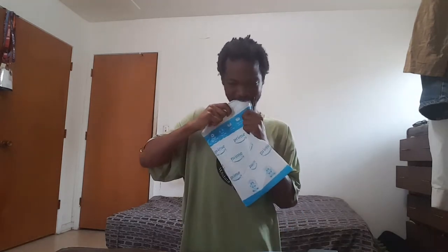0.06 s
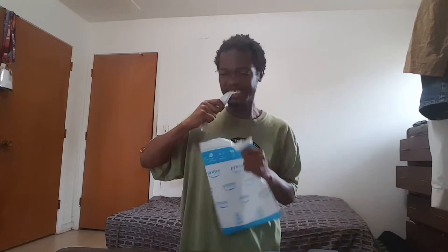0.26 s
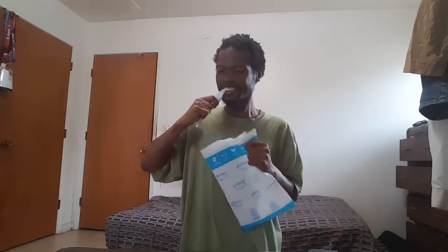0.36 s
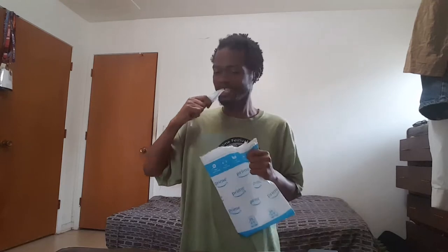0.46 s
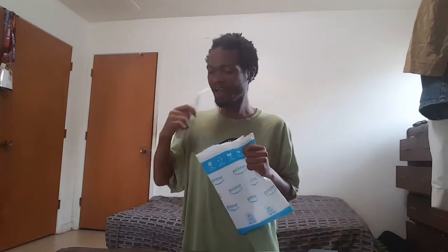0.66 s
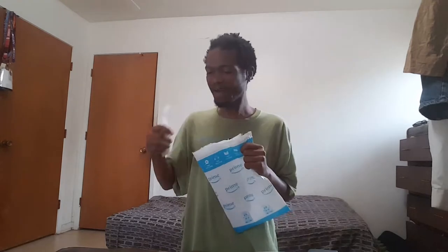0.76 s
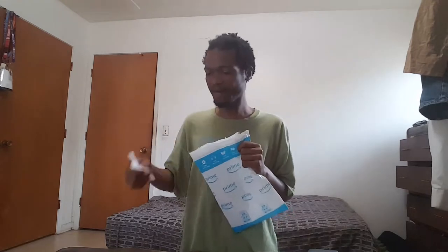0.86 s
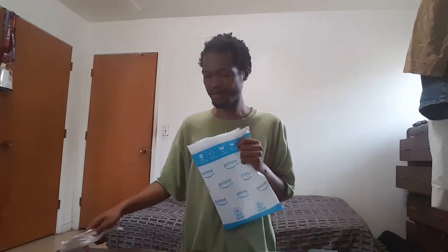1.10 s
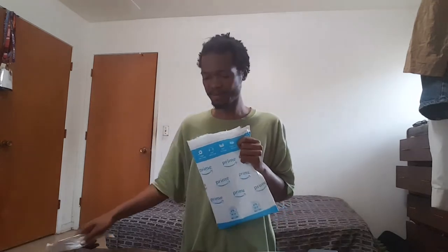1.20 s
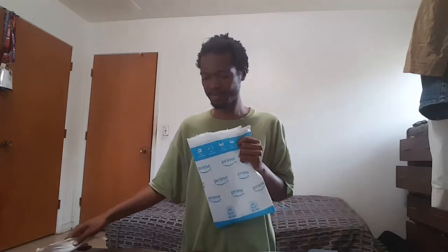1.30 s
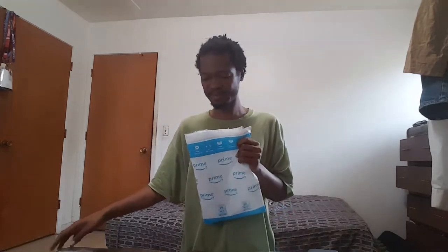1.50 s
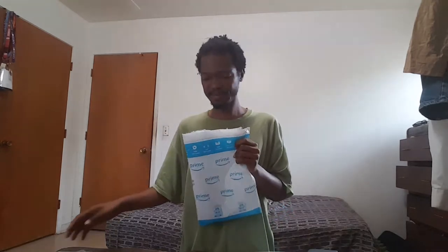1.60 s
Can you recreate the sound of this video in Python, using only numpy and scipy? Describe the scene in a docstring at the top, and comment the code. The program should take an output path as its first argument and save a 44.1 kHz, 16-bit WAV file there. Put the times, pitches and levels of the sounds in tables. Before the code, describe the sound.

A padded plastic mailer is torn open a few steps away in a small, quiet bedroom. It crinkles briefly, then at about 0.2 seconds rips in one loud, jerky pull with a soft thump. Creases crackle and pop until around 0.7 seconds, then thin to faint rustling. Near 1.5 seconds the torn strip is put down with a light, hollow tap. The walls add a short echo.

```python
"""Thin plastic crinkles and ticks as hands tense a padded mailer in a small bedroom, a few steps away.
One quick pull rips it open: the tear runs in slips and hard jerks that thump the pouch, the parting
film fizzes and the swinging pouch pushes a puff of air. Creases pop back and rustle, and the torn
strip is put down with a light, hollow tap. Bare walls add a short, bright tail over quiet room tone."""
import sys
import numpy as np
from scipy import signal
from scipy.fft import rfft, irfft
from scipy.io import wavfile

SR = 44100
rng = np.random.default_rng(int(sys.argv[2]) if len(sys.argv) > 2 else 0)


def to_wav(sig):
    """Store sig (one row per channel, or 1-D mono) as 16-bit WAV at the path in sys.argv[1].

    Samples outside -1..1 are clipped; the rate is SR.
    """
    pcm = np.clip(np.atleast_2d(sig), -1, 1) * 32767
    pcm = np.round(pcm).astype(np.int16)
    wavfile.write(sys.argv[1], SR, pcm.T)  # frames by channels


N = 72765

# Tone curves (f/Hz, relative level/dB)
ROOM_TONE_EQ = [(20, 0), (50, -4.5), (130, 2.5), (300, -0.5), (600, -6), (2000, -29.5), (6000, -28),
                (15500, -40)]  # low, still air
SWISH_EQ = [(15, -18), (45, 0), (75, 2.5), (150, -2), (500, -37)]  # bassy puff
SCUFF_EQ = [(150, -6), (600, -3), (1500, -3), (2800, 0), (3600, -15), (5500, -10), (8000, -30),
            (15500, -48)]  # dull contact of the tap
FILM_EQ = [(60, -21), (250, -9.5), (700, -1), (1300, -2), (2300, 0), (3500, -5.5), (5000, -8.5),
           (8000, -16), (10000, -18), (15500, -47)]  # midrange rustle
TICK_EQ = [(300, -20), (2000, -6), (5000, 0), (10000, -3), (12500, -9), (15500, -21)]  # crisp crackle
CRACK_EQ = [(100, -22), (500, -6.5), (1500, -4.5), (3500, -4), (5600, -1), (8000, -11.5), (12000, -16.5),
            (15500, -24)]  # broad snap of a crease
TEAR_EQ = [(30, -14), (80, -27), (135, -7), (280, 2), (450, -1), (900, 4.5), (1400, -6), (2300, -2.5),
           (3500, -11), (7000, -19.5), (15500, -37)]  # thick body of the rip
FIZZ_EQ = [(200, -17.5), (1000, -5), (2500, 1.5), (3500, -0.5), (5200, 0.5), (8000, -9.5), (11000, -13.5),
           (15500, -33)]  # bright edge of the rip
# Envelopes (t/s, level/dB)
SWISH_ENV = [(.2, -75), (.25, -65), (.31, -48), (.37, -67), (.52, -59), (.6, -75)]  # air pushed by the pouch
FLEX_ENV = [(0, -38.5), (.085, -40), (.15, -44), (.2, -37), (.36, -41), (.44, -38.5), (.48, -42),
            (.54, -49), (.6, -44), (.66, -51.5), (.72, -46.5), (.76, -61.5), (.85, -57.5), (.95, -68),
            (1.05, -53.5), (1.12, -54), (1.21, -53), (1.3, -73), (1.48, -64.5), (1.57, -57.5), (1.65, -69)]  # hands flexing the film
PULL_ENV = [(.205, -28.5), (.222, -25), (.24, -18.5), (.272, -18.5), (.288, -26.5), (.308, -32),
            (.325, -45.5), (.36, -65)]  # pull on the tear
FIZZ_ENV = [(.205, -62), (.225, -28), (.245, -30), (.278, -21), (.295, -29.5), (.32, -38.5), (.36, -58)]  # film parting
# Decay of the wall reflections (f/Hz, t60/s)
WALL_DECAY = [(125, 0.31), (300, 0.37), (700, .47), (2000, 0.41), (5000, 0.59), (14000, 0.27)]
# Hollow modes of the tap (f/Hz, decay to 1/e in t/s, level/dB)
TAP_MODES = [(626, 0.0028, -47), (1000, .0012, -38), (1644, 0.0023, -32.5), (2640, 0.0027, -33.5)]
# Creases popping over (t/s, ring f/Hz, ring level/dB, crack level/dB before its low-pass)
CREASE_POPS = [(.009, 1850, -32, -29), (0.0247, 2250, -26.5, -30), (0.029, 2200, -47, -17),
               (0.053, 2010, -24.5, -22), (0.062, 2210, -24.5, -40), (.089, 2330, -26, -18),
               (0.1666, 1260, -22.5, -17.5), (.212, 1850, -22, -9.5), (0.364, 2400, -42, -9.5),
               (0.416, 2230, -24.5, -18), (.43, 316, -35, -27), (.558, 2300, -48, -22),
               (0.5697, 1400, -22.5, -14), (.570, 3000, -18, -13.5), (0.5905, 1435, -25.5, -24),
               (0.5913, 5850, -15, -17), (.6187, 1550, -22.5, -8.5), (0.639, 1800, -25, -17),
               (.642, 1350, -47, -20), (0.672, 1950, -53, -34), (.683, 3900, -28, -21.5),
               (0.708, 1740, -26.5, -23), (0.713, 2040, -35, -21), (.7145, 830, -31.5, -44),
               (.7243, 716, -35.5, -17), (0.844, 2300, -47.5, -29), (0.898, 1700, -50, -33),
               (.9788, 1870, -36, -26.5), (1.0851, 1470, -29, -31), (1.0846, 487, -38, -37),
               (1.162, 1700, -39, -25), (1.205, 850, -41, -51), (1.2135, 1630, -39, -30),
               (1.2528, 2230, -39.5, -32), (1.2735, 1560, -39.5, -38), (1.3613, 1910, -36.5, -48),
               (1.377, 4400, -35, -28), (1.4113, 1750, -39.5, -39), (1.447, 1380, -44, -41),
               (1.551, 1850, -38.5, -29), (1.632, 2000, -36, -36)]
# Low resonances of the pouch and the room around it (f/Hz, t60/s, relative level/dB)
THUMP_MODES = [(132, 0.23, -40.5), (193, .14, -50), (255, 0.12, -36), (318.5, .14, -35.5)]
# Hard jerks of the tear (t/s, thwack f/Hz, thwack level/dB)
TEAR_JERKS = [(0.2182, 1280, -8), (.2187, 794, -4.5), (0.2208, 2280, -10), (.2247, 1000, -19),
              (.2285, 1410, -3), (0.2341, 1750, -9.5), (0.242, 1330, -5.5), (0.2462, 940, -2.5),
              (.2517, 880, -11), (0.2672, 1870, -6), (0.2667, 2630, -4.5), (0.2734, 1160, -4),
              (0.278, 1200, -12.5), (0.2935, 1210, -7), (0.3069, 1197, -5), (.3195, 1000, -19)]


def undb(db):
    """Decibels to gain."""
    return 10 ** (np.asarray(db) / 20)


def unit(x):
    """Scale to rms 1."""
    return x / np.sqrt(np.mean(x ** 2) + 1e-18)


def envelope(points, hold=False):
    """Gain over time from (t/s, level/dB) points; silent outside them, unless held."""
    s, db = np.array(points).T
    t = np.arange(N) / SR
    gain = undb(np.interp(t, s, db))
    return gain if hold else gain * (t >= s[0]) * (t <= s[-1])


def conv(x, response):
    """Play x through an impulse response."""
    return signal.fftconvolve(x, response)[:N]


def eq(x, points, size=4096):
    """Minimum-phase filter of unit energy, shaped by (f/Hz, level/dB) points."""
    hz, db = np.array(points).T
    n = np.arange(size)
    bin_hz = np.arange(size // 2 + 1) * SR / size
    gain = undb(np.interp(np.log(bin_hz + 1), np.log(hz), db))
    cepstrum = irfft(np.log(gain))
    causal = 2 * cepstrum * (n < size // 2) - cepstrum * (n == 0)
    response = irfft(np.exp(rfft(causal)))
    return conv(x, response / np.linalg.norm(response))


def ring(hz, decay_s):
    """A damped oscillation that falls to 1/e in decay_s and pushes no net air."""
    t = np.arange(int(7 * decay_s * SR) + 2) / SR
    phase = 2 * np.pi * hz * t
    swing = np.sin(phase) * np.exp(-t / decay_s) * (1 - np.exp(-phase))
    return np.diff(swing, prepend=0) / (2 * np.sin(np.pi * hz / SR))


def burst(decay_s, size=512):
    """A tiny avalanche of fractures that builds up and dies, of unit energy."""
    age = np.arange(size) / SR / decay_s
    grain = rng.choice([-1, 1], size) * np.exp(-age) * (1 - np.exp(-10 * age))
    return grain / np.linalg.norm(grain)


def clicks(per_s, scatter_db):
    """Random clicks, most small and a few large."""
    size = undb(scatter_db * np.minimum(rng.exponential(size=N), 3.5))
    return (rng.random(N) < per_s / SR) * size * rng.choice([-1, 1], N)


def add(out, s, sound):
    """Mix a sound in at time s."""
    i = max(int(s * SR), 0)
    out[i:i + len(sound)] += sound[:max(N - i, 0)]


def room_tone(level_db=-61.5):
    """The quiet air of the bedroom: a steady bed of dark noise."""
    return undb(level_db) * eq(rng.standard_normal(N), ROOM_TONE_EQ)


def reflections(bands=9, predelay_s=0.0024):
    """Dense wall reflections that die away at a different rate in each octave."""
    t = np.arange(N) / SR
    spectrum = rfft(rng.standard_normal(N))
    octave = np.log2(np.arange(len(spectrum)) * SR / N + 1)
    centres = np.geomspace(60, 15000, bands)
    hz, t60 = np.array(WALL_DECAY).T
    tail = np.zeros(N)
    for centre, pick in zip(centres, np.eye(bands)):
        band = irfft(spectrum * np.interp(octave, np.log2(centres), pick), N)
        band_t60 = np.interp(np.log(centre), np.log(hz), t60)
        tail += band * np.exp(-np.log(1000) * t / band_t60)
    tail *= t > predelay_s
    return tail / np.linalg.norm(tail)


def room_reverb(x, wet_db=-4.5, move_hz=5):
    """The mailer keeps moving, so its sound shifts between two sets of reflections."""
    turn = 2 * np.pi * move_hz * np.arange(N) / SR
    return undb(wet_db) * (conv(x * np.cos(turn), reflections()) + conv(x * np.sin(turn), reflections()))


def pouch_swish():
    """The swinging pouch pushes air in two soft, low puffs."""
    return eq(rng.standard_normal(N), SWISH_EQ) * envelope(SWISH_ENV)


def strip_tap(at_s=1.4897):
    """The strip is put down: one light, scuffing knock on something small and hollow."""
    contact = np.zeros(N)
    add(contact, at_s, undb(-23) * burst(decay_s=0.0012))
    knock = eq(contact, SCUFF_EQ)
    for hz, decay_s, db in TAP_MODES:
        add(knock, at_s, undb(db) * ring(hz, decay_s))
    return knock


def film_crinkle(pitches=14, buckles_per_s=1100, ring_cycles=1.01, tick_decay_s=0.00078):
    """Small creases buckle as the film flexes, each with a brief pitch; taut film also crackles."""
    rustle = np.zeros(N)
    for hz in np.geomspace(250, 14000, pitches):
        buckles = clicks(buckles_per_s / pitches, scatter_db=2)
        rustle += np.sqrt(hz) * unit(conv(buckles, ring(hz, ring_cycles / hz)))
    fractures = np.abs(clicks(per_s=400, scatter_db=2.5))
    tick_env = signal.lfilter([1], [1, -np.exp(-1 / (tick_decay_s * SR))], fractures)
    ticks = unit(eq(tick_env * rng.standard_normal(N), TICK_EQ))
    flex = envelope(FLEX_ENV, hold=True)
    crispness = undb(-12) * (flex / flex.max()) ** 0.34  # the tauter the film, the more it ticks
    return (unit(eq(rustle, FILM_EQ)) + crispness * ticks) * flex


def crease_pops(ring_cycles=1.7, mode_spread=0.24, crisp_db_per_octave=9.5):
    """Large creases snap over, each with a sharp crack and a few cycles of the panel's close modes."""
    rings, cracks = np.zeros(N), np.zeros(N)
    for s, hz, ring_db, crack_db in CREASE_POPS:
        # the more a pop cracks rather than rings, the brighter its crack
        cutoff_hz = min(5500 * 2 ** ((crack_db - ring_db) / crisp_db_per_octave), SR / 2 - 2000)
        crack = signal.lfilter(*signal.butter(2, cutoff_hz, fs=SR), burst(decay_s=0.0009))
        add(cracks, s, undb(crack_db) * crack)
        add(rings, s, undb(ring_db) * ring(hz, ring_cycles / hz))
        for side, detune in zip((-1, 1), rng.standard_normal(2)):
            side_hz = hz * np.exp(side * mode_spread + 0.23 * detune)
            add(rings, s, np.sign(detune) * undb(ring_db - 6) * ring(side_hz, ring_cycles / side_hz))
    return rings + eq(cracks, CRACK_EQ)


def pouch_thump(slips):
    """The tear's slips shake low resonances of the pouch and room, giving the rip its weight."""
    return sum(undb(db - 12) * unit(conv(slips, ring(hz, t60 / np.log(1000))))
               for hz, t60, db in THUMP_MODES)


def film_fizz():
    """The parting film sheds a fine, bright spray of clicks."""
    return eq(unit(clicks(per_s=3500, scatter_db=4)) * envelope(FIZZ_ENV), FIZZ_EQ)


def rip(thwack_cycles=0.76, crack_boost_db=6.5):
    """The tear advances in small slips and hard, thwacking jerks; returns its sound and the raw slips."""
    slips = unit(clicks(per_s=800, scatter_db=3)) * envelope(PULL_ENV)
    thwacks = np.zeros(N)
    for s, hz, db in TEAR_JERKS:
        add(slips, s, undb(db + crack_boost_db) * burst(decay_s=0.00075))
        add(thwacks, s, undb(db) * ring(hz, thwack_cycles / hz))
    return eq(slips, TEAR_EQ) + thwacks, slips


def scene():
    """Mono mix: the plastic and the tap feed the reverb; thump, swish and room tone sit underneath."""
    tear, slips = rip()
    direct = tear + film_fizz() + film_crinkle() + crease_pops() + strip_tap()
    low_layers = pouch_thump(slips) + pouch_swish() + room_tone()
    return (direct + room_reverb(direct) + low_layers)[None]


def record(dry, low_cut_hz=47, high_cut_hz=15650):
    """Drop the deep bass, round the highest peaks and cut the very top."""
    low_cut = signal.butter(3, low_cut_hz, "high", fs=SR, output="sos")
    high_cut = signal.ellip(10, 0.2, 80, high_cut_hz, fs=SR, output="sos")
    rounded = np.tanh(signal.sosfilt(low_cut, dry))
    return signal.sosfilt(high_cut, rounded)


dry = scene()
out = record(dry)
to_wav(out)
```